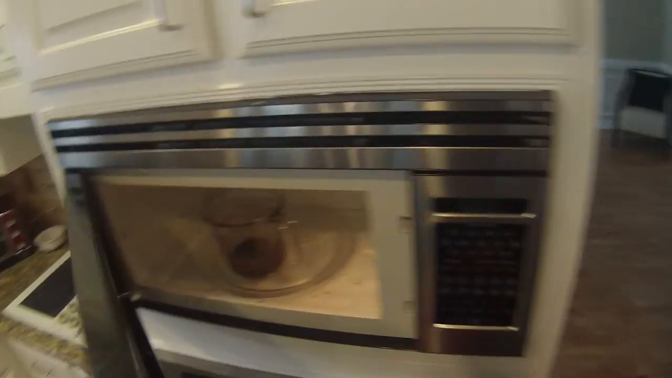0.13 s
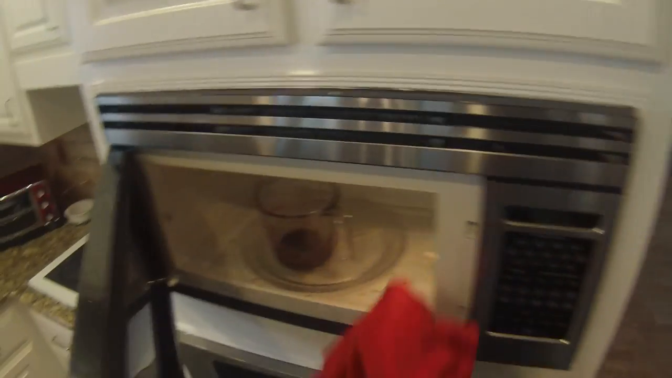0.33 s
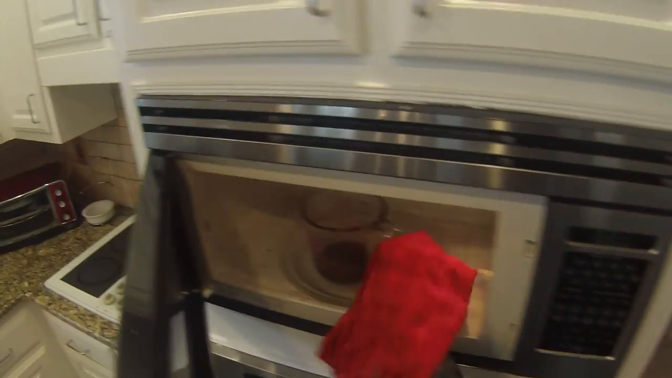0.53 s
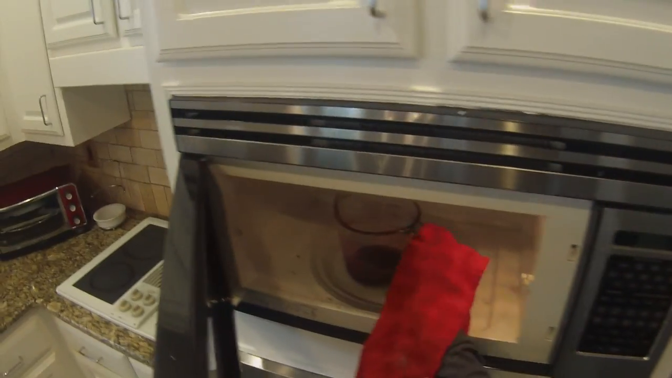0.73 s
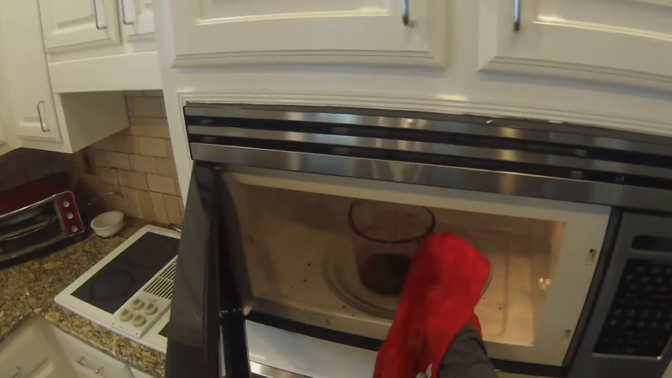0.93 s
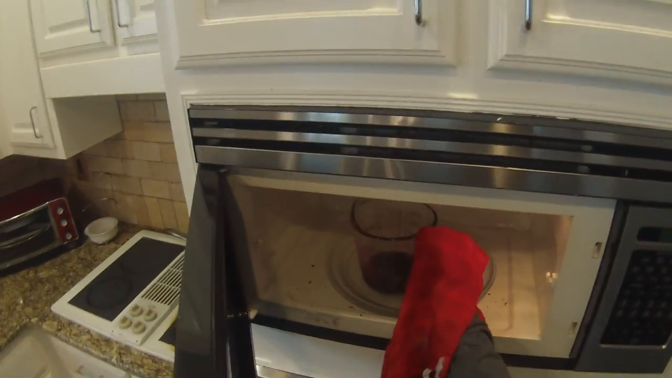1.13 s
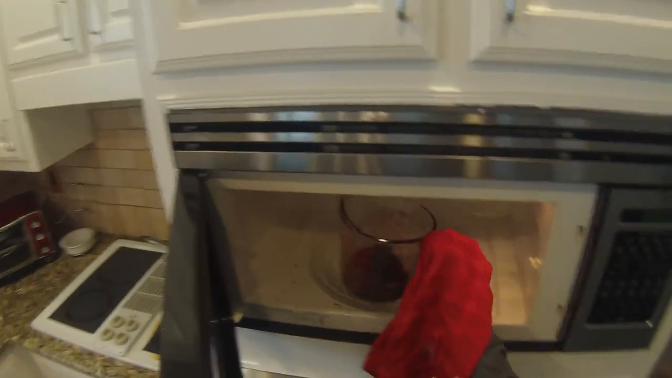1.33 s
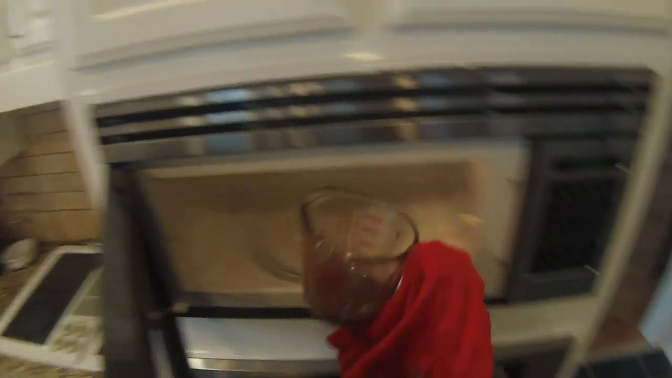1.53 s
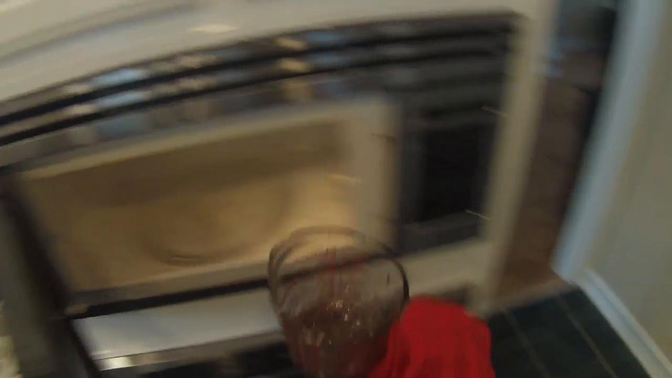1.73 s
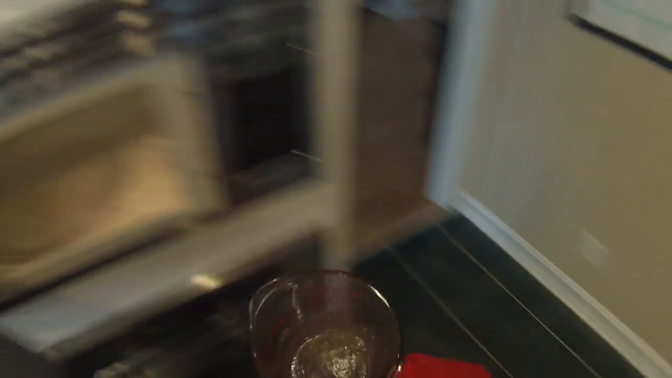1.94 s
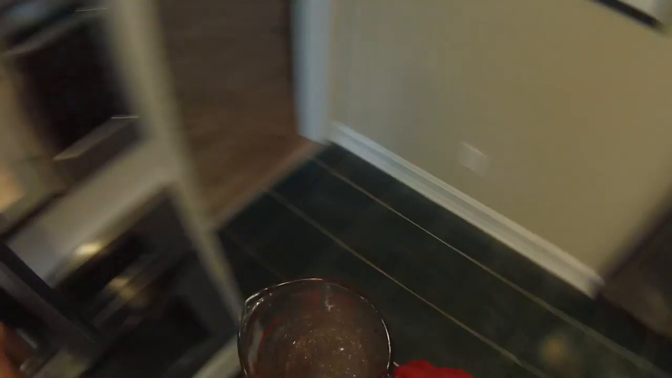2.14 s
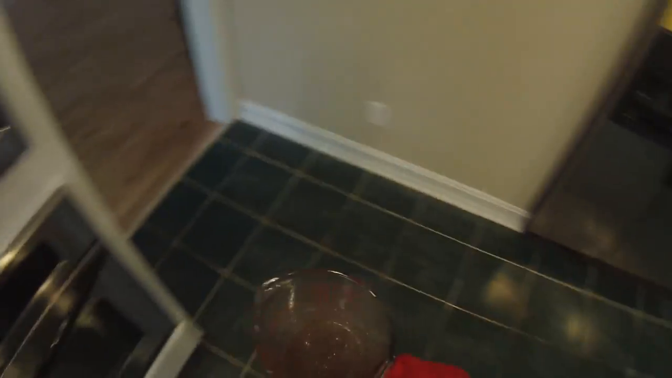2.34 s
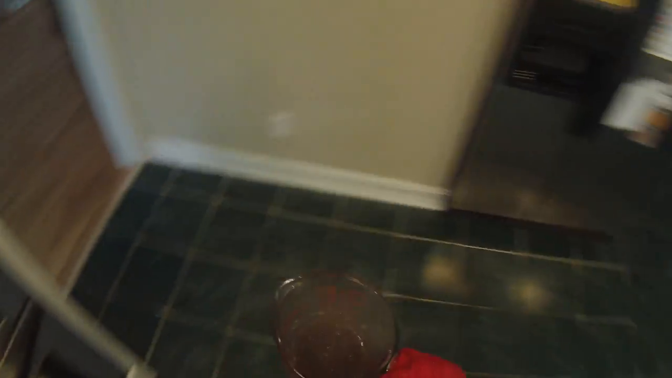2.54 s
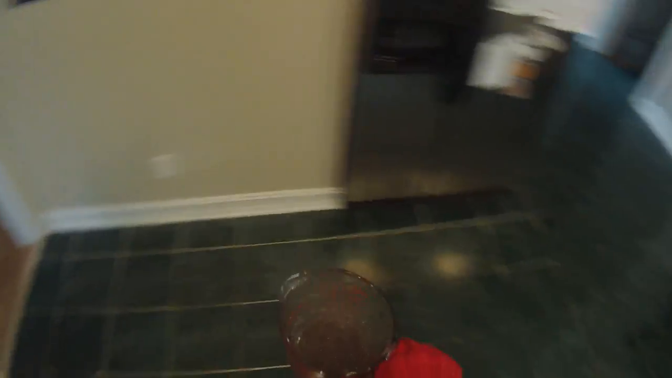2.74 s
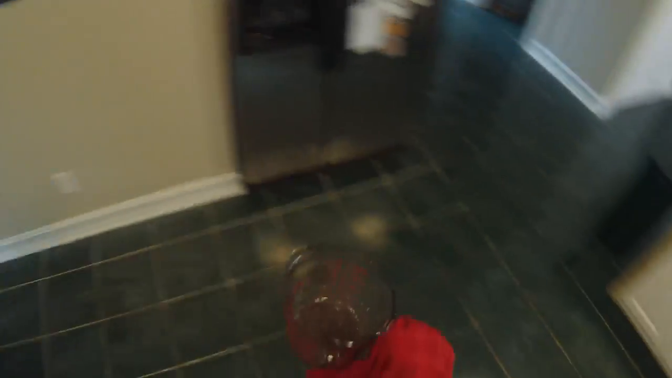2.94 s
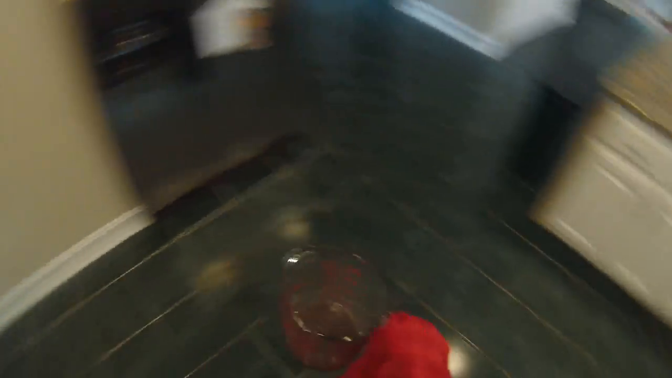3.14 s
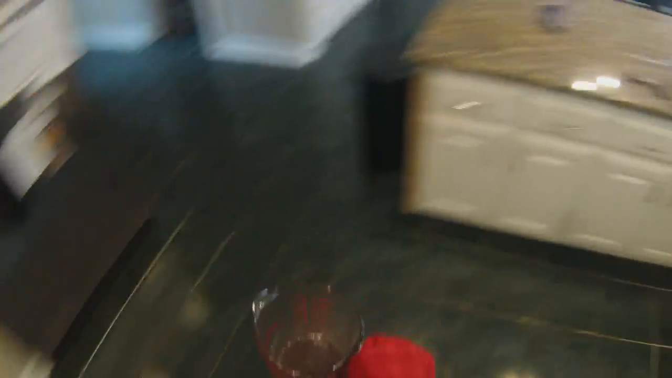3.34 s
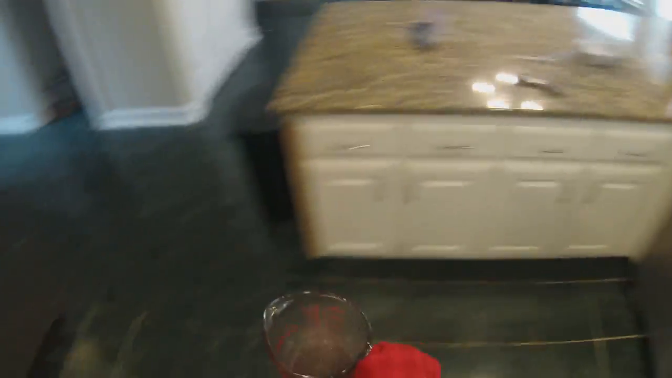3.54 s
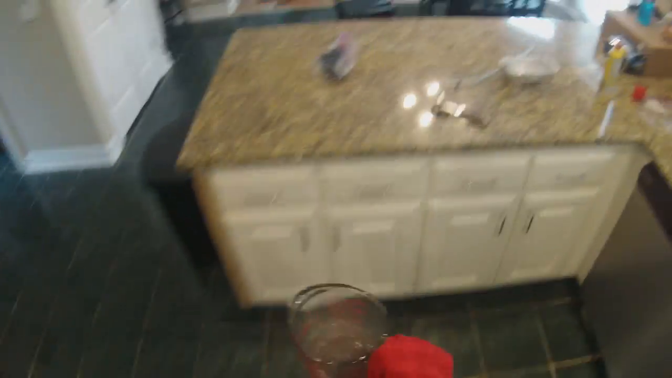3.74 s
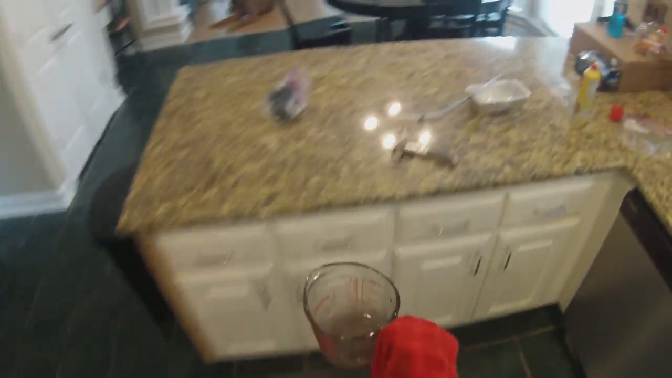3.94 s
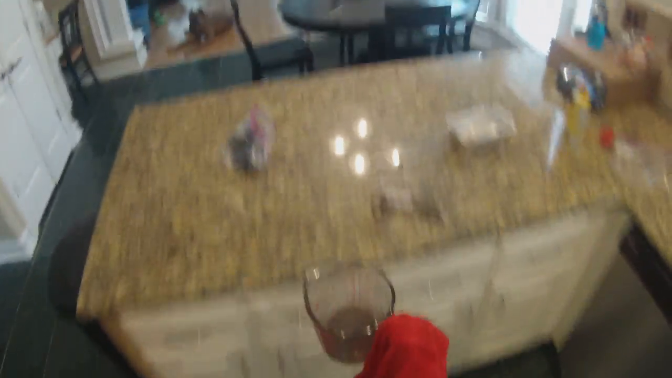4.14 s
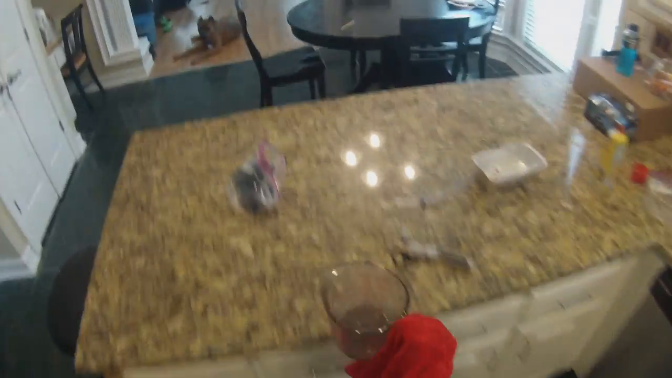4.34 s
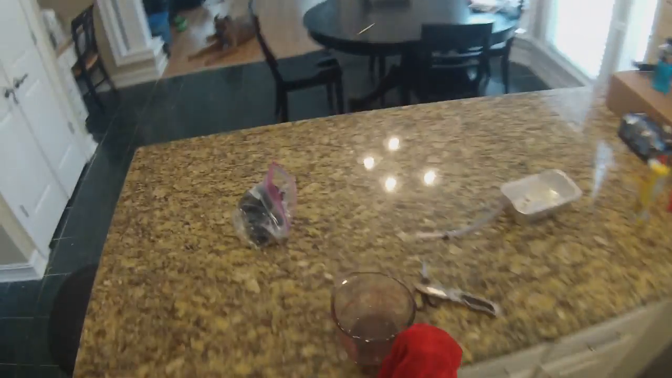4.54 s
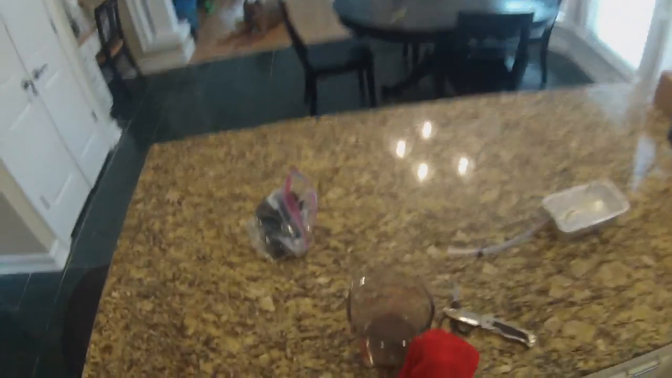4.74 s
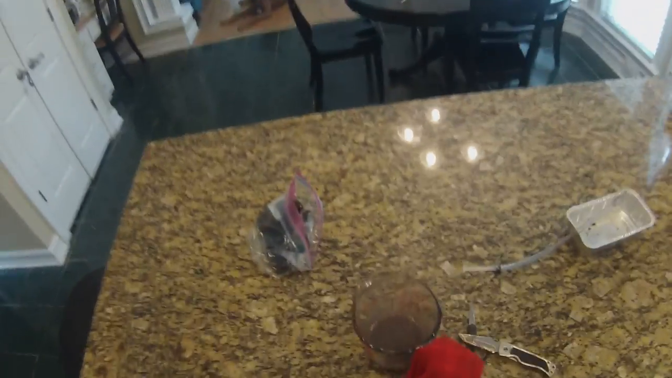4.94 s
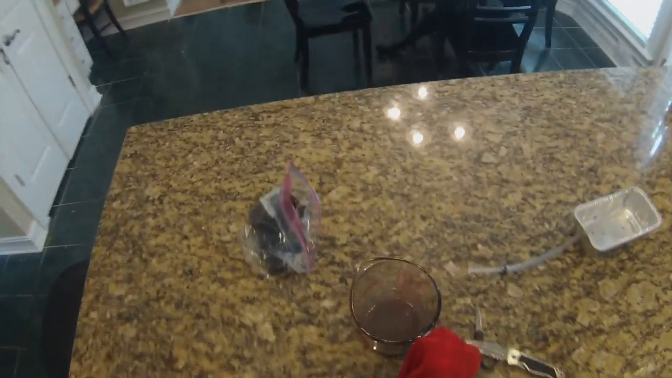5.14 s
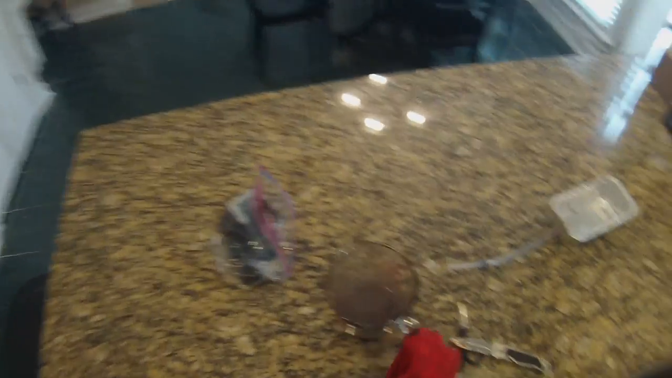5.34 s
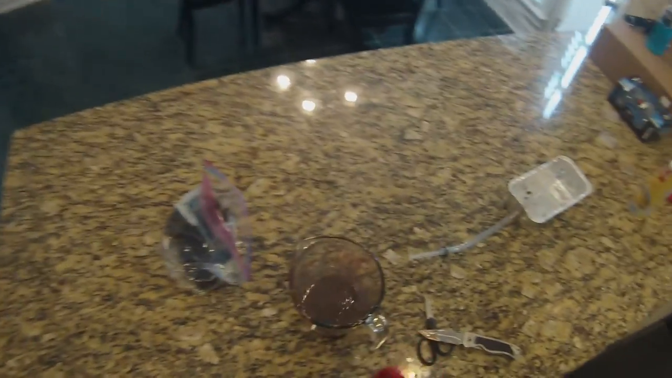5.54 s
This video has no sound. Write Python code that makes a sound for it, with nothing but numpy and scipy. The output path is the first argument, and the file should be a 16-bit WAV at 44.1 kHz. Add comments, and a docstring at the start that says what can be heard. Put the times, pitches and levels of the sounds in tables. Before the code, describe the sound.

Heard from a microphone worn on the body in a tiled, echoing kitchen, soft cloth rustle and small bumps lead into a short, squeaky scrape of glass on glass. A microwave door slams and latches with a metallic thud. Quiet shoe scuffs and a faint squeak follow, then the loudest sound: a glass cup set down hard on stone, rattling briefly as it settles over faint room tone.

```python
"""A glass measuring cup knocks down on a stone countertop and rocks to rest, cup and slab ringing.
Before that it scrapes and squeals off a microwave's glass turntable, the door swings shut and
latches with a boom of the metal case, and a few steps scuff across the floor.
Place: a hard, tiled kitchen that rings after each knock, over a faint room tone.
Microphone: mono, worn on the body, within arm's reach of the cup; sleeve and mitt brush close by."""
import sys
import numpy as np
from scipy import signal
from scipy.fft import rfft, irfft, next_fast_len
from scipy.io import wavfile
from scipy.ndimage import uniform_filter1d, minimum_filter1d, map_coordinates

SR = 44100
rng = np.random.default_rng(int(sys.argv[2]) if len(sys.argv) > 2 else 0)


def to_wav(s):
    """Save 16-bit WAV."""
    ch = np.atleast_2d(s).T  # columns
    pcm = np.round(np.clip(ch, -1, 1) * 32767)  # PCM
    wavfile.write(sys.argv[1], SR, pcm.astype(np.int16))


N = 246597

# the cup's base meets the stone, then rocks more softly: t/s, knock level/dB
CUP_KNOCKS = [(4.8987, -4.5), (4.9005, -1), (4.944, -12), (4.957, -10), (4.9975, -7), (5.021, -21.5),
              (5.11, -12.5), (5.133, -12)]
# cup and slab ringing together: f/Hz, level/dB, t60/s
CUP_MODES = [(213, -23, 0.064), (416.4, -19, 0.24), (660, -7.5, 0.099), (710, -1.5, 0.067), (770, 0, 0.013),
             (1177, -5, 0.0095), (1467, -13.5, 0.05), (1950, -14, 0.021), (2656, -25, 0.046)]
# spectrum of the crack of glass on stone: f/Hz, level/dB
CUP_CRACK = [(60, -40.5), (120, -20), (190, -11), (310, -21), (600, -9.5), (740, 8), (1040, -13),
             (1500, -11.5), (2600, -27.5), (4000, -38), (5000, -32.5), (9000, -60.5), (12800, -57),
             (15500, -73)]
# spectrum of the knock as the walls return it: f/Hz, level/dB
CUP_ROOM = [(60, -48.5), (130, -29.5), (215, -19.5), (300, -23), (410, -12), (470, -14), (684, 0),
            (1040, -16), (1950, -21), (3400, -41), (4900, -51), (5500, -53.5), (12600, -66.5), (15000, -73)]
# clusters of close modes in the cup's glass wall: f/Hz, width/Hz, level/dB
GLASS_SHIMMER = [(1923, 120, 10), (2340, 680, 0), (4600, 600, -10.5), (8500, 170, -31.5), (11000, 680, -27),
                 (12900, 450, -29.5)]

# the door's hooks touch, ride up and snap home, the slam last: t/s, thud level/dB, clatter level/dB
DOOR_HITS = [(2.61, -60, -39.5), (2.699, -62, -42.5), (2.722, -56, -38.5), (2.736, -45, -33),
             (2.746, -40.5, -22), (2.7519, -12, -15)]
# the oven's sheet metal case: f/Hz, level/dB, t60/s
OVEN_MODES = [(26.5, -17.5, 0.99), (42.6, -16, 0.33), (72.5, -26, .25), (116.4, -13.5, 0.28),
              (190.8, -10.5, 0.31), (255, -5.5, 0.18), (291, 1, 0.14), (370.5, -9, 0.24), (462, -11, 0.17),
              (571, -11, 0.31), (708, -14.5, 0.095), (906, -14.5, 0.075), (1600, -22.5, 0.11),
              (4630, -30, 0.11)]
# spectrum of the latch's clatter: f/Hz, level/dB
LATCH_CLATTER = [(60, -52), (140, -36), (200, 3), (290, -3), (430, -5), (600, 4), (850, -1), (1200, -15),
                 (2200, -15.5), (3100, -20), (3700, -24), (4700, -18), (6500, -27), (9000, -35),
                 (13500, -38.5), (15500, -57.5)]
# spectrum of the door as the walls return it: f/Hz, level/dB
DOOR_ROOM = [(40, -17), (110, -3), (145, -13), (190, -2.5), (285, 2.5), (400, -9.5), (540, -4), (720, -6),
             (1150, -24), (3100, -27), (3800, -32), (4800, -28.5), (7500, -40.5), (15000, -47)]

# the cup's base catches on the turntable and judders: t/s, level/dB
CATCHES = [(0.745, -45), (0.763, -35.5), (.908, -48), (0.952, -48.5), (1.019, -53)]
# between catches it glides and squeals: t/s, hold/s, level/dB
GLIDES = [(0.733, 0.014, -49), (0.772, 0.008, -36.5), (.797, 0.038, -43.5), (0.902, .032, -44)]
# resonances of the glass turntable on the oven floor: f/Hz, width/Hz, level/dB
TURNTABLE_PEAKS = [(188, 60, 2.5), (327, 90, -0.5), (434, 63, 0), (479, 26, -2), (673, 51, 0),
                   (781, 37, -3.5), (1081, 44, -9)]
# resonances of the rims of turntable and cup: f/Hz, width/Hz, level/dB
RIM_PEAKS = [(1520, 62, -3), (1960, 240, 1), (2740, 200, -4.5), (4000, 130, -14), (5100, 300, -16)]

# small contacts of handling and walking: t/s, bump level/dB, click level/dB
TAPS = [(0.088, -49, -69.5), (.143, -56, -50), (.211, -63, -51.5), (0.239, -60, -44), (.309, -37.5, -74),
        (.331, -43, -72), (0.506, -55, -74), (1.295, -45.5, -45), (2.548, -60, -55), (3.132, -35.5, -48),
        (3.523, -66, -52.5), (3.933, -47, -62)]
# spectrum of a dull bump: f/Hz, level/dB
BUMP = [(60, -51), (150, -30), (230, -5), (310, -11), (400, -2.5), (490, -4.5), (580, 4.5), (640, -10.5),
        (720, -2.5), (950, -9), (1300, -30.5), (4000, -33.5), (7000, -64)]
# spectrum of a dry click: f/Hz, level/dB
CLICK = [(600, 2.5), (2000, 8), (3500, 1), (5500, 1.5), (7500, -3.5), (9000, -4), (11000, -14),
         (15000, -10.5)]

# soles scuff the tiles: middle t/s, half length/s, level/dB
SCUFFS = [(0.35, 0.04, -66.5), (2.38, 0.067, -64.5), (3.667, 0.082, -70.5), (3.997, 0.052, -55),
          (4.529, 0.055, -55)]
# a sole grips and chirps: t/s, level/dB
SKIDS = [(3.979, -50.5), (4.085, -66)]
# resonances of a sole skidding on tile: f/Hz, width/Hz, level/dB
SOLE_PEAKS = [(1000, 91, 1), (2150, 220, -2.5), (3300, 360, 1), (4750, 210, -8)]
# sleeve and mitt brush by the microphone: middle t/s, half length/s, level/dB
SLEEVE_STROKES = [(0.02, 0.081, -48), (0.21, 0.092, -60.5), (2.266, 0.067, -64.5), (2.653, 0.039, -48.5),
                  (3.185, 0.064, -54.5), (3.496, 0.053, -57.5), (3.955, 0.015, -56.5), (4.09, 0.025, -54)]
# midrange spectrum of rubbing cloth and soles: f/Hz, level/dB
RUSTLE = [(100, -23), (220, -8.5), (400, -4.5), (580, -1.5), (800, -3.5), (1200, -15.5), (3000, -17.5),
          (6000, -47.5)]
# treble spectrum of that rubbing: f/Hz, level/dB
HISS = [(800, -33), (1500, -45), (2800, -1.5), (3800, -1.5), (4900, 4), (6200, 0), (8000, -6),
        (10000, -11.5), (13000, -9.5), (15500, -22)]
# bass spectrum of the jogged microphone: f/Hz, level/dB
RUMBLE = [(15, -23), (30, -2.5), (110, -0.5), (200, -1), (400, -18), (1500, -65)]

# spectrum of the room tone: f/Hz, level/dB
ROOM_TONE = [(12, -38.5), (20, -2.5), (59, -6), (87, -8), (213, -13.5), (324, -17), (362, -16.5),
             (478, -16.5), (549, -19), (597, -21.5), (649, -16.5), (906, -24), (4680, -33), (13500, -44.5),
             (15500, -50.5)]
# reverberation time of the tiled kitchen: f/Hz, t60/s
KITCHEN_T60 = [(100, 0.82), (300, 0.79), (700, 0.98), (2000, 0.97), (5000, 1), (8000, 0.79), (14000, 0.38)]


def cup_on_stone():
    """Glass on stone: a hard crack and a short ring, damped by the hand; each contact fills the room."""
    ring_db, room_db = -5.5, 14  # relative to the knock
    shimmer_db = -46.5  # relative to the crack
    out, crack, off_walls = np.zeros(N), pulse(CUP_CRACK), pulse(CUP_ROOM)
    t = np.arange(SR // 2) / SR
    for start, knock_db in CUP_KNOCKS:
        crack_db = 18 + 2.65 * knock_db  # the crack grows much faster than the knock
        add(out, start, amp(crack_db) * crack)
        add(out, start, amp(knock_db + ring_db) * ring(CUP_MODES, attack=0.00055, scatter_db=4.0))
        # only a hard contact wakes the high modes of the glass
        shimmer = resonate(rng.standard_normal(len(t)), GLASS_SHIMMER) * decay(t, t60=0.5)
        add(out, start, amp(crack_db + shimmer_db) * shimmer)
        reverb = signal.fftconvolve(kitchen_tail(build=0.003), off_walls)
        add(out, start, amp(knock_db + room_db) * reverb)
    # the cup's sound is cut below about 55 Hz
    return signal.sosfilt(signal.butter(2, 55, "high", fs=SR, output="sos"), out)


def oven_door():
    """The latch clatters, the case booms and the walls answer; the door shudders after the slam."""
    rebound_s, thud_loss_db, clatter_loss_db = 0.016, 10, 7  # spacing, and loss at each rebound
    room_db = 21.5  # relative to the clatter
    slam_s, slam_thud_db, slam_clatter_db = DOOR_HITS[-1]
    rebounds = [(slam_s + k * rebound_s, slam_thud_db - k * thud_loss_db,
                 slam_clatter_db - k * clatter_loss_db) for k in (1, 2, 3)]
    out, off_walls = np.zeros(N), pulse(DOOR_ROOM)
    for start, thud_db, clatter_db in DOOR_HITS + rebounds:
        add(out, start, amp(thud_db) * ring(OVEN_MODES, attack=0.0012, scatter_db=4.5))
        add(out, start, amp(clatter_db) * burst(LATCH_CLATTER, t60=0.11))
        reverb = signal.fftconvolve(kitchen_tail(build=0.015), off_walls)
        add(out, start, amp(clatter_db + room_db) * reverb)
    return out


def cup_scrape():
    """Glass sticks and slips on glass: uneven slips shake the turntable, fast ones lock into a squeal."""
    slip_hz = 190 * np.exp(0.25 * wobble(160))
    slips = np.diff(np.floor(np.cumsum(slip_hz) / SR), prepend=0)  # one impulse a slip
    slips *= amp(3.7 * wobble(150))
    shake = sum(amp(db) * envelope(start, attack=0.0038, hold=0.011, t60=0.38) for start, db in CATCHES)
    judder = shake * resonate(slips, TURNTABLE_PEAKS)
    # the rims chatter only under the hardest catches
    hardest_db = max(db for _, db in CATCHES)
    jolts = sum(amp(1.35 * (db - hardest_db)) * envelope(start, attack=0.0038, hold=0, t60=0.12)
                for start, db in CATCHES)
    chatter = amp(-43) * jolts * resonate(slips, RIM_PEAKS)
    return in_room(judder + chatter + squeal(), wet_db=-14)


def squeal():
    """The gliding base sings; its pitch rises and falls with the speed of one pull."""
    pull_start_s, pull_length_s = 0.73, 0.33
    rest_hz, rise_hz = 774, 85
    progress = np.clip((np.arange(N) / SR - pull_start_s) / pull_length_s, 0, 1)
    speed = np.sin(np.pi * progress)
    pitch_hz = (rest_hz + rise_hz * speed) * (1 + 0.02 * wobble(200))
    phase = 2 * np.pi * np.cumsum(pitch_hz) / SR
    gliding = sum(amp(db) * envelope(start, attack=0.0067, hold=hold, t60=0.061)
                  for start, hold, db in GLIDES)
    return gliding * amp(2.4 * wobble(120)) * unit(np.sin(phase))


def taps():
    """Each small contact of hand or foot gives a dull bump and a dry click."""
    out = np.zeros(N)
    for start, bump_db, click_db in TAPS:
        add(out, start, amp(bump_db) * burst(BUMP, t60=0.062))
        add(out, start, amp(click_db) * burst(CLICK, t60=0.019))
    return in_room(out, wet_db=-9)


def cloth_and_soles():
    """Grainy rubbing: cloth right by the microphone, jogging it, and soles down on the tiles."""
    rustle = unit(noise(RUSTLE) * amp(2 * wobble(70)))
    hiss = unit(noise(HISS) * amp(1.2 * wobble(200)))
    rumble = noise(RUMBLE)
    cloth = swells(SLEEVE_STROKES) * (rustle + amp(-11.5) * hiss + amp(-3) * rumble)
    soles = swells(SCUFFS) * (hiss + amp(1.5) * rustle + amp(-7.5) * rumble)
    return in_room(cloth + soles + skid(), wet_db=-7)


def skid():
    """A sole grips the tile and chirps in narrow bands of noise."""
    grip = sum(amp(db) * envelope(start, attack=0.005, hold=0.015, t60=0.16) for start, db in SKIDS)
    return grip * resonate(rng.standard_normal(N), SOLE_PEAKS)


def kitchen_tail(build):
    """The walls' answer, of energy 1: echoes build up, then each frequency dies at its own speed."""
    hz, t, spectra = signal.stft(rng.standard_normal(SR * 3 // 2), SR, nperseg=256)
    spectra *= decay(t, along(KITCHEN_T60, hz)[:, None])
    tail = signal.istft(spectra, SR, nperseg=256)[1]
    tail *= 1 - np.exp(-np.arange(len(tail)) / SR / build)
    return tail / np.linalg.norm(tail)


def in_room(x, wet_db):
    """The direct sound plus the kitchen's reverberation."""
    return x + amp(wet_db) * signal.fftconvolve(x, kitchen_tail(build=0.01))[:N]


def room_tone():
    """The faint, steady rumble and hiss of the house."""
    return amp(-57 + 0.2 * wobble(5.02)) * noise(ROOM_TONE)


def amp(db):
    """Decibels to gain."""
    return 10 ** (np.asarray(db) / 20)


def decay(t, t60):
    """A gain that falls 60 dB every t60 seconds."""
    return amp(-60 * t / t60)


def unit(x):
    """Scaled to rms 1."""
    return x / np.sqrt(np.mean(x ** 2) + 1e-20)


def along(points, hz):
    """Interpolate (f/Hz, value) points on a log frequency axis."""
    freqs, values = np.transpose(points)
    return np.interp(np.log(hz + 1), np.log(freqs + 1), values)


def wobble(rate):
    """A smooth random curve, rate knots a second."""
    knots = rng.standard_normal(int(N * rate / SR) + 4)
    return map_coordinates(knots, [np.arange(N) * rate / SR])


def filtered(x, response):
    """x through a complex frequency response."""
    size = next_fast_len(len(x) + SR // 2)
    return irfft(rfft(x, size) * response(np.fft.rfftfreq(size, 1 / SR)), size)[:len(x)]


def noise(spectrum):
    """Coloured noise of rms 1."""
    return unit(filtered(rng.standard_normal(N), lambda hz: amp(along(spectrum, hz))))


def resonate(x, peaks):
    """x through resonances with steep skirts, at rms 1."""
    def response(hz):
        return sum(amp(db) * (1j * hz * width / (centre ** 2 - hz ** 2 + 1j * hz * width)) ** 2
                   for centre, width, db in peaks)
    return unit(filtered(x, response))


def pulse(spectrum, size=4096):
    """The shortest causal pulse with this spectrum, of energy 1."""
    cepstrum = irfft(np.log(amp(along(spectrum, np.fft.rfftfreq(size, 1 / SR)))))
    cepstrum[1:size // 2] *= 2  # fold onto positive time for minimum phase
    cepstrum[size // 2 + 1:] = 0
    wave = irfft(np.exp(rfft(cepstrum)))
    return wave / np.linalg.norm(wave)


def burst(spectrum, t60):
    """A coloured patter that starts at rms 1 and dies away."""
    t = np.arange(SR // 2) / SR
    return signal.fftconvolve(rng.standard_normal(len(t)) * decay(t, t60), pulse(spectrum))


def ring(modes, attack, scatter_db):
    """Damped modes, at new strengths for every blow."""
    t = np.arange(SR) / SR
    tones = sum(amp(db + scatter_db * rng.standard_normal()) * decay(t, t60) * np.sin(2 * np.pi * hz * t)
                for hz, db, t60 in modes)
    return tones * (1 - np.exp(-t / attack))


def envelope(start, attack, hold, t60):
    """A straight rise to 1, a hold, then an even fall in dB; times in seconds."""
    t = np.arange(N) / SR - start
    return np.clip(t / attack, 0, 1) * decay(np.maximum(t - attack - hold, 0), t60)


def swells(strokes):
    """Strokes that swell and fade evenly about their middle."""
    t = np.arange(N) / SR
    return sum(amp(db) * np.exp(-((t - middle) / half) ** 2) for middle, half, db in strokes)


def add(track, start, sound):
    """Mix a sound in at start seconds."""
    part = track[round(start * SR):][:len(sound)]
    part += sound[:len(part)]


def scene():
    """The kitchen as it reaches the body-worn microphone."""
    return (cup_on_stone() + oven_door() + taps() + cup_scrape() + cloth_and_soles() + room_tone())[None]


def record(dry):
    """A fast limiter holds peaks to full scale; the treble is then cut off at the band limit."""
    top_hz = 15400
    needed_gain = 1 / np.maximum(np.abs(dry[0]), 1)
    gain = uniform_filter1d(minimum_filter1d(needed_gain, size=65), size=65)
    return filtered(dry[0] * gain, lambda hz: hz < top_hz)[None]


dry = scene()
out = record(dry)
to_wav(out)
```